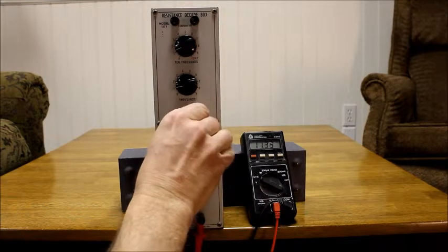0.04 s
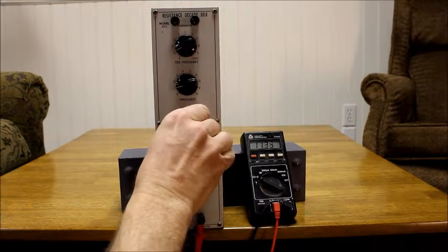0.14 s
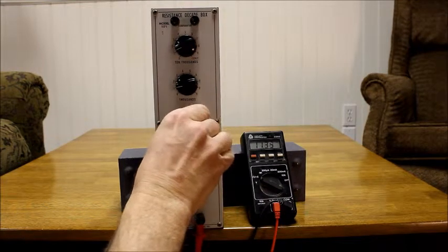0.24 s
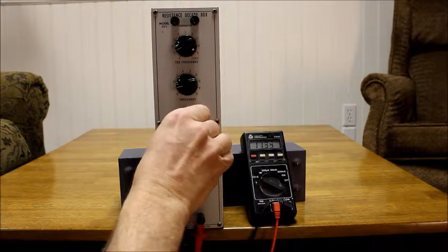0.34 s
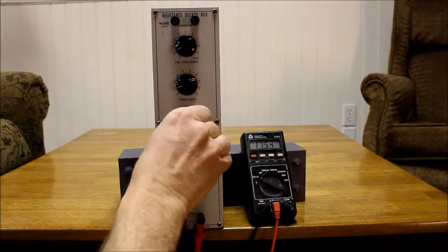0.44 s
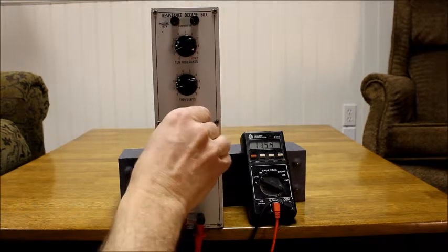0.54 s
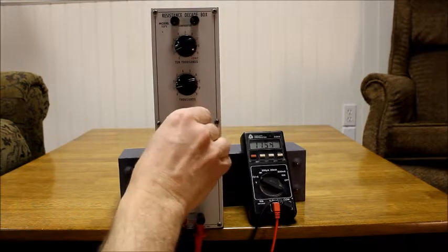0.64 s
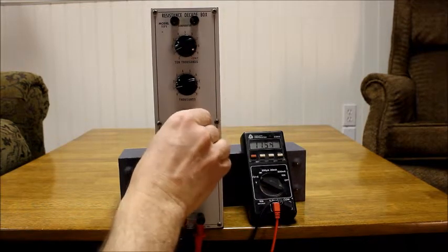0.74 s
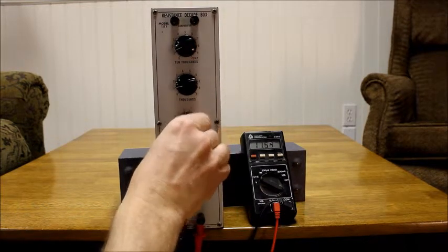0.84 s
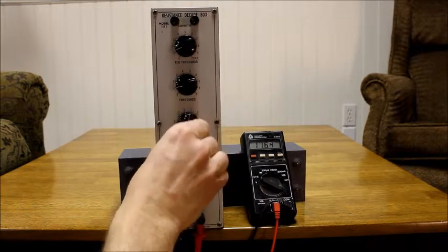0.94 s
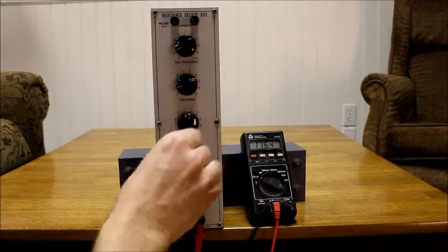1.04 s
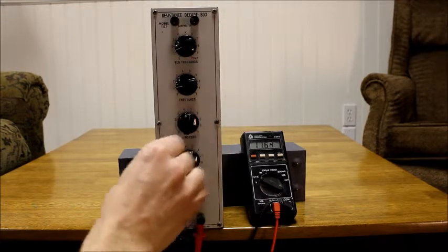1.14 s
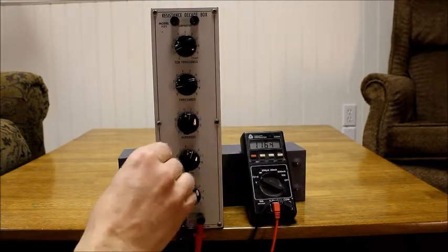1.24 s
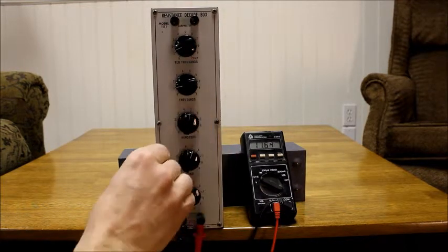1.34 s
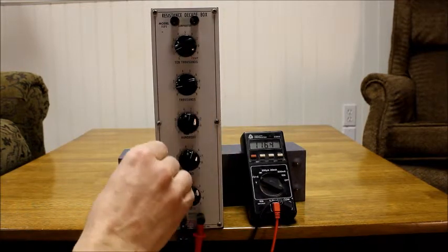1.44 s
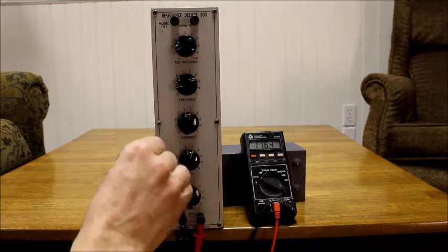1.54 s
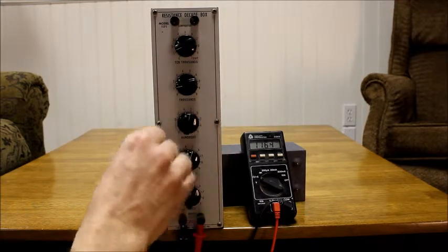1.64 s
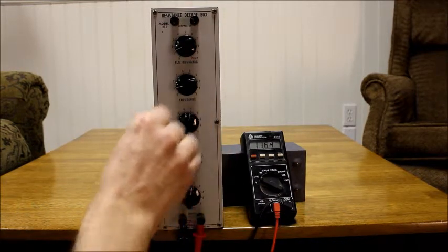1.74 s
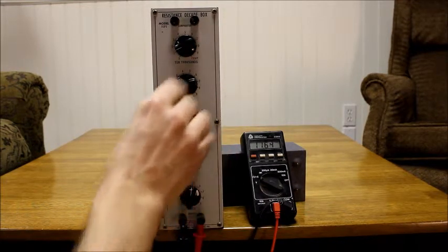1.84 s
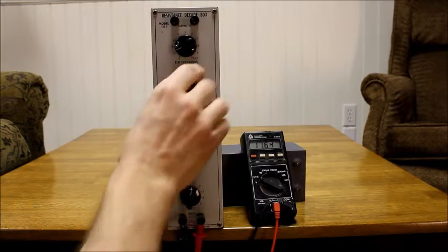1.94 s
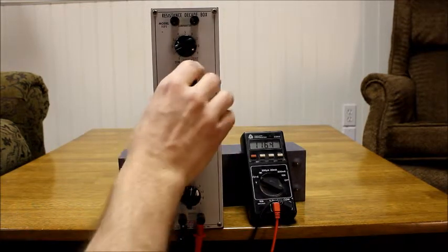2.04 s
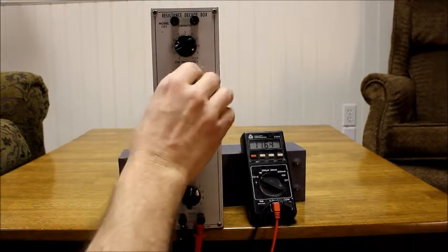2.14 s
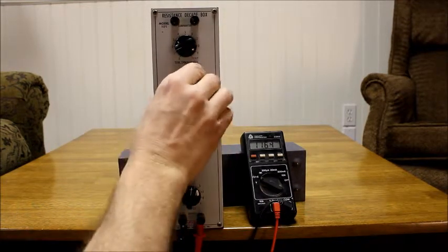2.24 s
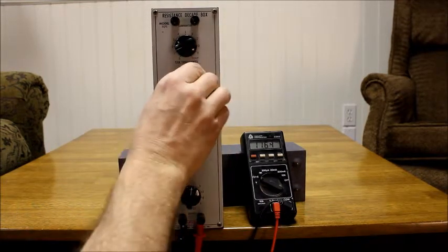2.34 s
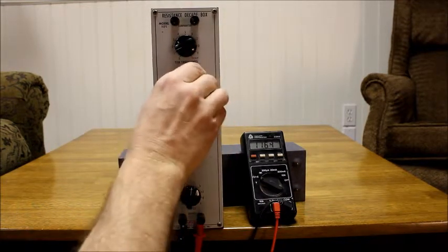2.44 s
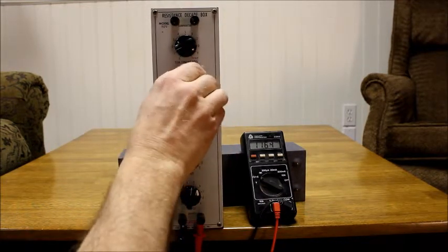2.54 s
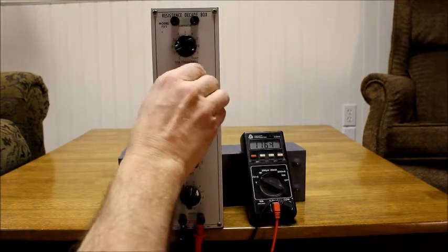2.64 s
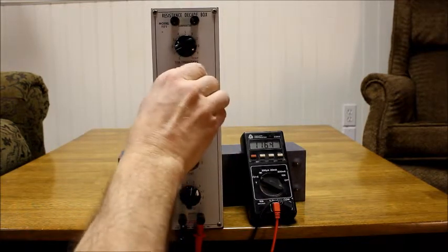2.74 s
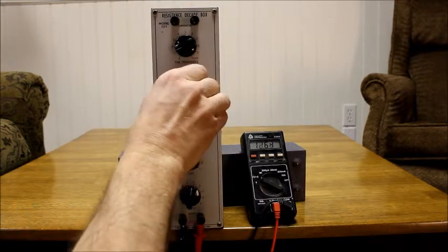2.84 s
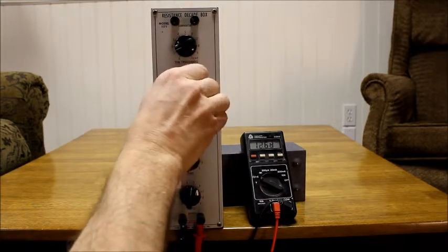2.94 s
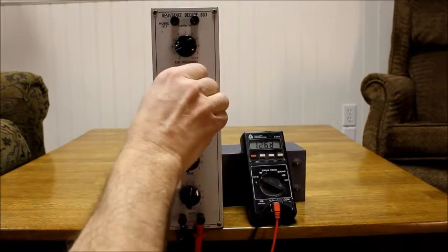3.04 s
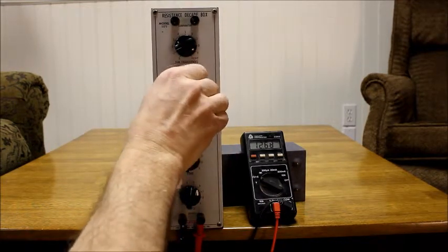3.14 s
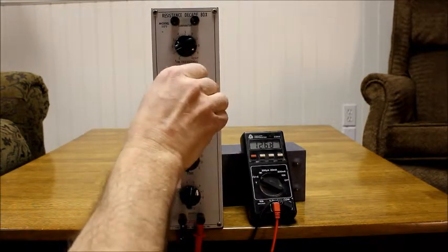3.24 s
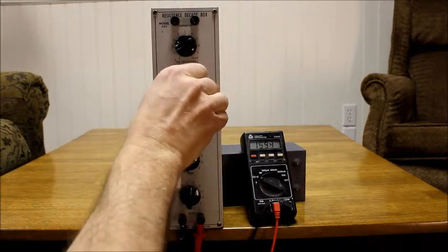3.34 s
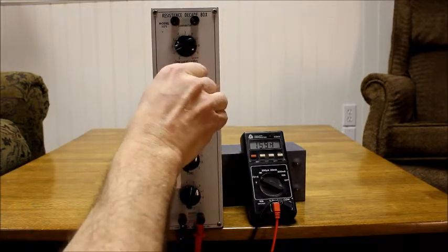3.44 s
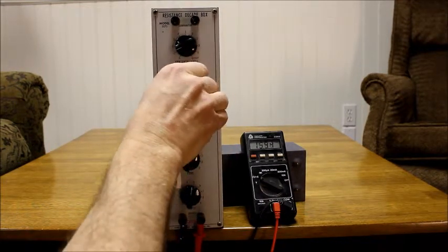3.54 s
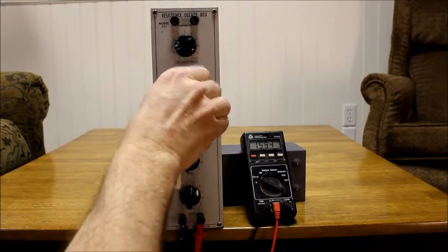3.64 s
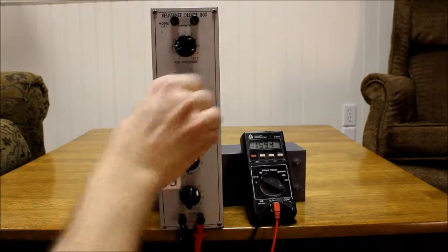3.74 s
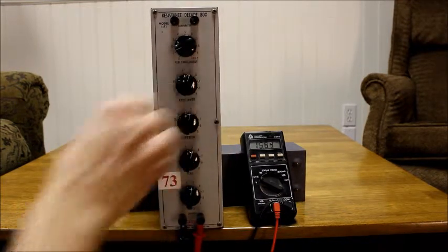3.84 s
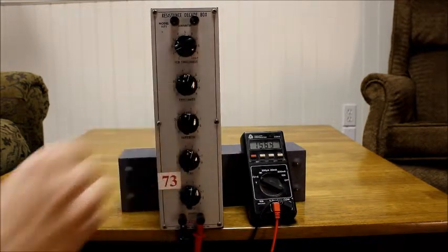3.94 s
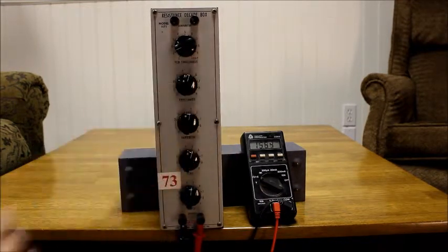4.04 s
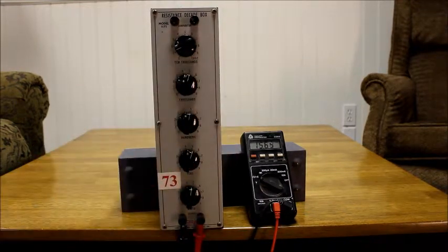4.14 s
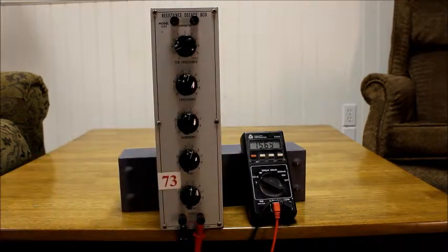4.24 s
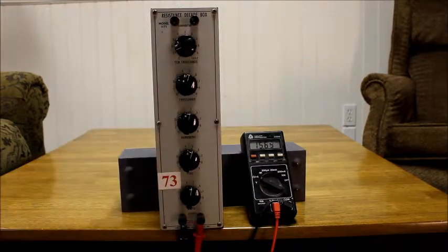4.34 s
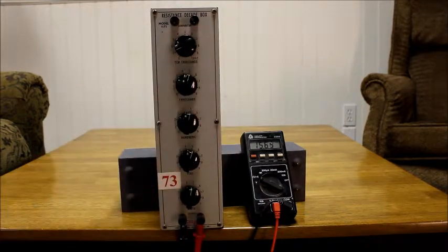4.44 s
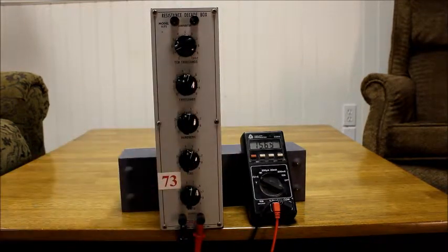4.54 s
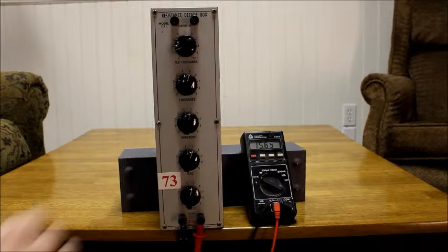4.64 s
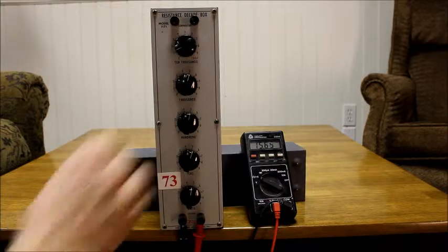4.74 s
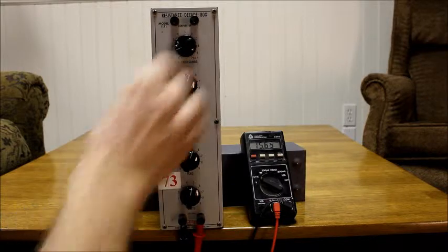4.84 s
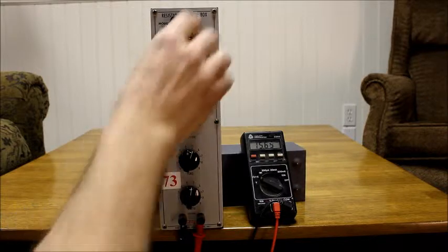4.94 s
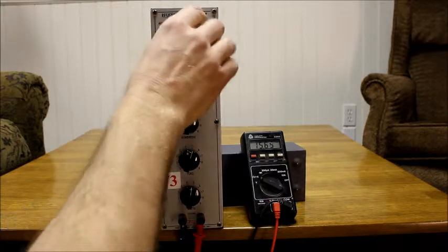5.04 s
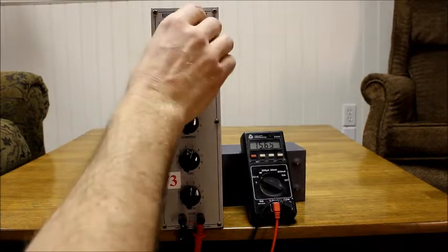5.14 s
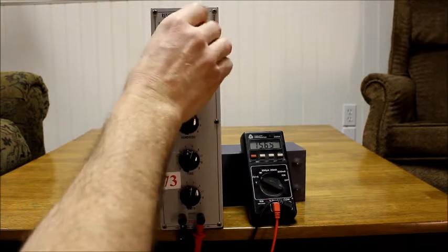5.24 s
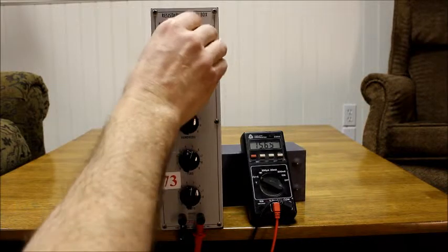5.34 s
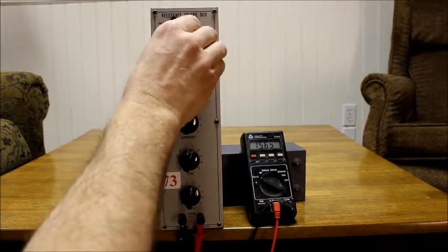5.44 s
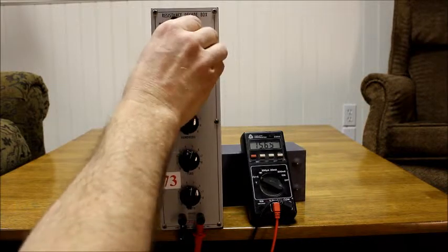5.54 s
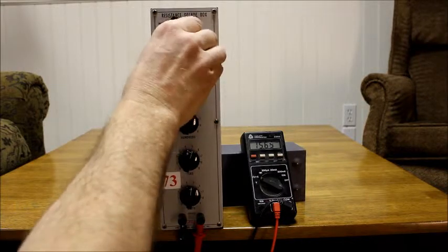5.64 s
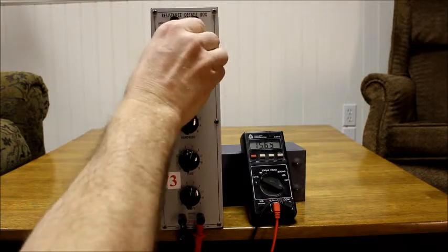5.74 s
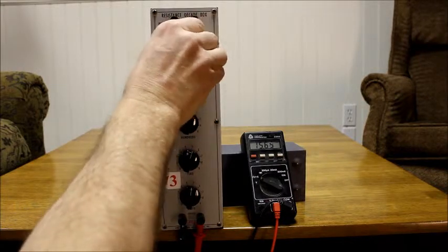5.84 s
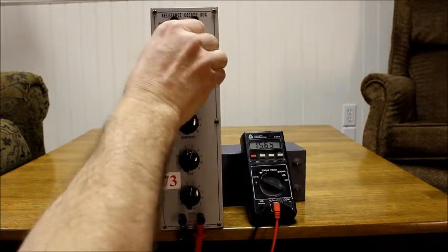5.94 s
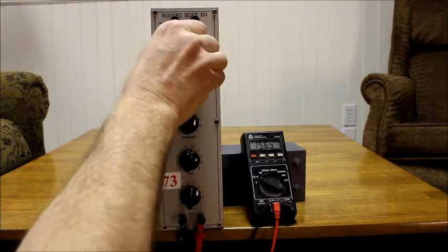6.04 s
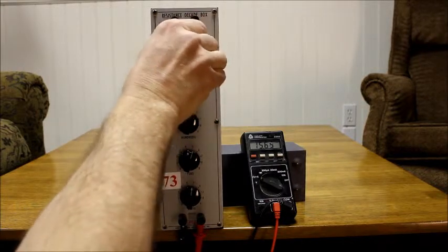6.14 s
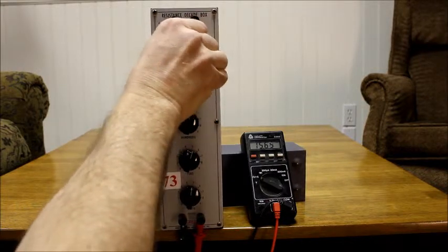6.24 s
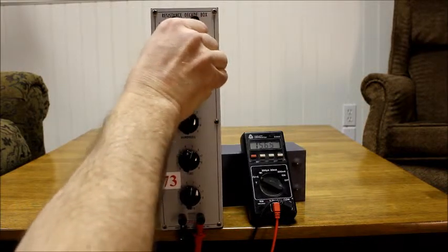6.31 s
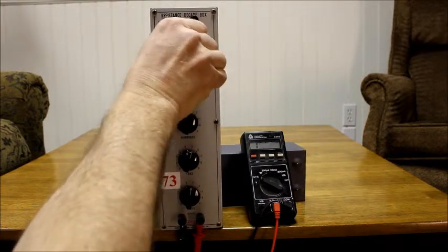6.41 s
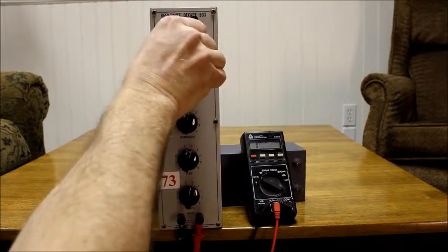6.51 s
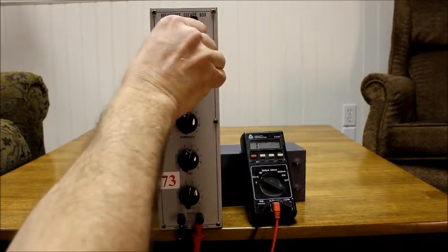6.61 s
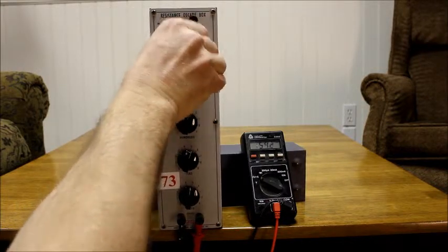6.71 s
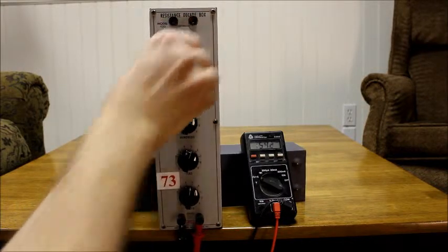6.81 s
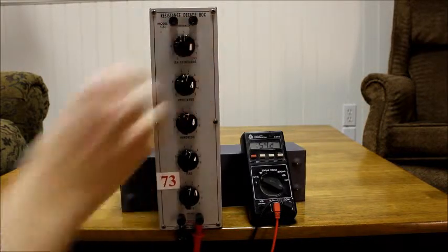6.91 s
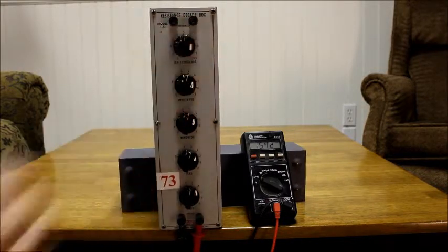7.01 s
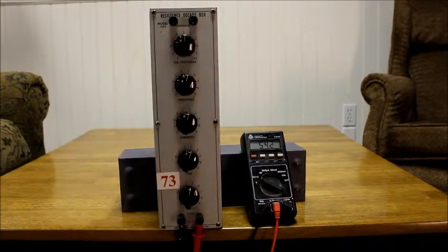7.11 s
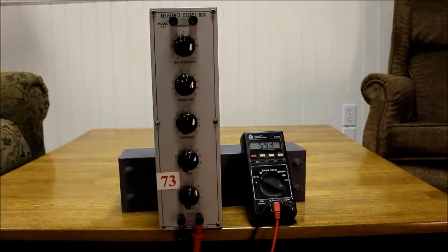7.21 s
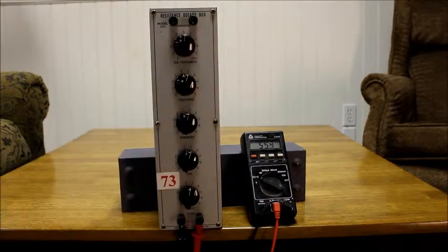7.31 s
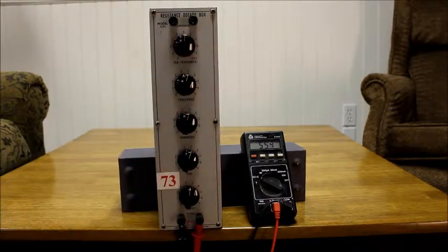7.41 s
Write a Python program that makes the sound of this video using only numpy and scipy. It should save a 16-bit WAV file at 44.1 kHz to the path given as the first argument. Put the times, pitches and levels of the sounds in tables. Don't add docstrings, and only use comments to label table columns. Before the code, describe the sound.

Close by, a hand steps rotary switches on a sheet-metal box. Two bright, loud clicks come at once, then a pause; four evenly spaced clacks follow with woody thumps, then faint handling, then four more, softer and more hollow. Tiny loose contacts jangle after each snap. A small furnished room answers briefly over low ventilation rumble and faint hiss.

```python
import sys
import numpy as np
from scipy import signal
from scipy.fft import rfft, irfft, next_fast_len
from scipy.io import wavfile
from scipy.ndimage import uniform_filter1d

SR = 44100
rng = np.random.default_rng(int(sys.argv[2]) if len(sys.argv) > 2 else 0)


def gain_from_db(level_db):
    decades = np.asarray(level_db, float) / 20
    return 10 ** decades


def persist_wave(psi):
    counts = np.round(np.clip(psi, -1, 1) * 32767).astype(np.int16)
    wavfile.write(sys.argv[1], SR, np.atleast_2d(counts).T)


N = 329427
LEAD = 4410
SPAN = 8192
T = np.arange(SPAN) / SR

# [t/s, snap level/dB,
# strongest ring f/Hz, knock into knob and case level/dB]
MIDDLE_SWITCH_DETENTS = [
    (-0.063, -8, 8700, -23),
                         (0.165, -15.5, 2880, -23),
    (0.4767, -15, 3470, -21),
]
UPPER_DETENTS = [
    (2.6338, -18.5, 7000, -12.5),
    (2.8908, -20.5, 6850, -9),
    (3.1802, -18, 3480, -12),
    (3.4765, -20, 7650, -10),
]
TOP_DETENTS = [
    (5.7542, -22.5, 6800, -7),
    (6.0325, -23, 7430, -7.5),
    (6.3205, -19, 6480, -10.5),
    (6.6253, -21.5, 7180, -7.5),
]
# [t/s, snap level/dB, ring f/Hz, knock level/dB]
TOUCHES = [(0.4492, -50, 3680, -21), (2.3888, -36, 6100, -13), (2.5194, -68, 3690, -7),
           (3.692, -51.5, 2680, -5), (5.2325, -50, 2740, -6), (5.3991, -48.5, 2850, -6.5),
           (5.417, -50.5, 2890, -6), (6.8214, -38, 2970, -12), (7.1023, -52.5, 4360, -5),
           (7.2418, -47, 2000, -6.5)]
# [t/s, snap level/dB, ring f/Hz]
BOUNCES = [
    (0.1764, -30, 2700),
    (2.6685, -35.5, 2900),
    (5.7567, -26, 4300),
    (6.0398, -33.5, 3540),
    (6.0482, -39, 4000),
    (6.342, -45, 4350),
]
# [f/Hz, width/Hz, level/dB]
MIDDLE_RINGS = [(2700, 350, 12), (5320, 64, 2), (6830, 390, 12), (7400, 120, -1), (8440, 140, -22),
                (12000, 81, -8), (12700, 130, -14), (13700, 440, -8), (14700, 130, -23)]
UPPER_RINGS = [(2670, 130, -1), (4860, 130, -18), (6560, 180, 7.5), (3860, 480, 12), (7300, 200, 5),
               (9300, 110, 3), (10000, 160, 7), (10800, 170, -4), (12800, 400, -15.5)]
TOP_RINGS = [(2850, 550, 11.5), (4300, 240, 3), (5840, 830, 5), (9450, 120, 9), (10800, 180, 2),
             (13400, 160, 15), (12800, 190, 11), (13800, 210, -8.5), (14700, 130, -20.5)]
# [f/Hz, level/dB, t60/s]
MIDDLE_KNOB = [(1406, -0.58, 0.011), (1797, -1.4, 0.075)]
MIDDLE_CASE = [(428, 26, 0.058), (610, 9, 0.14), (720, -23, 0.062)]
UPPER_KNOB = [(1270, -1, 0.016), (1430, -2, 0.0061), (1700, -10.5, 0.072), (1094, -25, 0.0076)]
UPPER_CASE = [(414, -7.5, 0.07), (618, -15, 0.31), (690, 4, 0.027)]
TOP_KNOB = [(1316, -3.5, 0.023), (1561, -14.5, 0.073), (1130, -48, 0.004)]
TOP_CASE = [(280, 16, 0.044), (408, 23.5, 0.038), (527, -3, 0.12), (600, -19, 0.046), (734, -1, 0.11)]
# [f/Hz, level/dB]
SNAP_COLOUR = [(900, -21.5), (1600, -8.5), (2200, -7.5), (3100, -3.5), (4300, -4.5), (5500, 0.5),
               (7200, -6), (8800, -9.5), (10000, -40.5)]
SPARKLE_COLOUR = [(7800, -8), (9000, 5.5), (10500, 11), (12000, 6), (13500, 9.5), (15000, 6.5),
                  (16000, -14), (17000, -22)]
MIDDLE_PARTS = (MIDDLE_RINGS, MIDDLE_KNOB, MIDDLE_CASE)
UPPER_PARTS = (UPPER_RINGS, UPPER_KNOB, UPPER_CASE)
TOP_PARTS = (TOP_RINGS, TOP_KNOB, TOP_CASE)
# [events, parts, light blow?, sparkle level/dB, case over knob level/dB, rattle t60/s,
# jangle level/dB, snap level/dB, lift of the sparkle above 11 kHz/dB, panel level/dB]
BLOWS = (
    (MIDDLE_SWITCH_DETENTS, MIDDLE_PARTS, False, .6, 5.5, .014, -15, -6, 5, -10),
    (UPPER_DETENTS, UPPER_PARTS, False, -4, -.3, .018, -13, -5, -4, -7),
    (TOP_DETENTS, TOP_PARTS, False, -7.5, -.4, .009, -8, -5, .6, -11),
    (TOUCHES, UPPER_PARTS, True, -16, 4, .02, -9, -10, -1.5, -20),
    ([(*row, -30) for row in BOUNCES], UPPER_PARTS, True, -12, .1, .014, -16, -6, 1.5, -14),
)
LIGHT_SPARKLE_DB_PER_OCTAVE = 11.5

# [f/Hz, t60/s]
ROOM_T60 = [(150, 1), (400, 0.79), (1000, 0.27), (2800, 0.16), (7000, 0.17), (14000, 0.064)]
ROOM_DB, EARLY_DB, EARLY_T60_S = -14.5, -15, 0.045
# [f/Hz, level per Hz/dB]
AIR_COLOUR = [(15, -68), (25, -16), (43, -23.5), (59, -6), (109, -0.5), (231, -11), (318, -10),
              (383, -15.5), (427, -11), (673, -21), (856, -19.5), (1060, -25.5), (4500, -32.5),
              (15000, -39)]
AIR_DB = -47.5
WHISTLE_HZ, WHISTLE_DB, WHISTLE_THROB_HZ = 15735, -74, 13.5

# [t/s, thump level/dB, hardness level/dB]
ROCKS = [(0.009, -39, -12), (2.64, -25.5, -7.5), (2.674, -24, -1.5), (2.896, -31.5, -3),
         (3.185, -31, -14.5), (3.479, -36, -3), (5.262, -38, -8), (5.317, -38, -7), (5.409, -36.5, -16),
         (5.488, -42, -14), (5.573, -43, -2), (5.768, -24, -11.5), (5.784, -23.5, -8), (6.03, -31.5, -1.5),
         (6.321, -27, -3), (6.622, -39.5, -19), (6.779, -39.5, -7), (6.83, -38.5, -16), (6.901, -45, -7)]
LANDINGS = [
    (2.668, -24, 5),
    (5.757, -24, -8),
]
ROCK_PUSH_S, LANDING_PUSH_S = 0.0358, 0.0061
# [f/Hz, level/dB, t60/s]
TABLE_MODES = [(151, -25, 0.024), (170, 0.8, 0.14), (196, -4.5, 0.17), (290, -2.5, 0.031),
               (447, 1.5, 0.056), (508, -5.5, 0.042), (650, -9.5, 0.055), (872, -30, 0.015)]
TOP_HZ = 15830


def along(table, hz):
    return np.interp(np.log(hz + 1), np.log(np.array(table)[:, 0]), np.array(table)[:, 1])


def decay(t60, t=T):
    return np.exp(-np.log(1000) * t / t60)


def conv(blow, response):
    return signal.fftconvolve(blow, response)[:len(blow)]


def peak(x, db):
    return x * gain_from_db(db) / np.sqrt(uniform_filter1d(x ** 2, size=176).max())


def band_pass(x, lo_hz, hi_hz):
    return signal.sosfilt(signal.butter(2, [lo_hz, hi_hz], "band", fs=SR, output="sos"), x)


def colour(db):
    cepstrum = irfft(db * np.log(10) / 20)
    cepstrum[1:512] *= 2
    cepstrum[513:] = 0
    return irfft(np.exp(rfft(cepstrum)))


def modes(table, scatter_db=1.8, detune=.012):
    hz, db, t60 = np.transpose(table)[:, :, None]
    level_luck, pitch_luck = rng.standard_normal((2, len(table), 1))
    sines = np.sin(2 * np.pi * hz * (1 + detune * pitch_luck) * T)
    return np.sum(gain_from_db(db + scatter_db * level_luck) * sines * decay(t60), axis=0)


def rattle(t60, rate, rise_s):
    chance = rng.random((2, SPAN))
    hits = (chance[0] < rate / SR) * (2 * chance[1] - 1)
    return hits * (1 - np.exp(-T / rise_s)) * decay(t60)


def add(out, s, x):
    i = int(s * SR) + LEAD
    out[..., i:i + SPAN] += x[..., :N + LEAD - i]


def detent(row, rings, knob, case, rattle_t60, jangle_db, snap_db, edge_db, panel_db):
    _, db, ring_hz, sparkle_db, knob_db, case_db = row
    blow = peak(rattle(rattle_t60, rate=16000, rise_s=.0004), 0)
    strike = peak(rattle(.003, rate=16000, rise_s=.0003), 0)
    blow = blow + gain_from_db(-8) * strike
    jangle = peak(rattle(.1, rate=15000, rise_s=.004), jangle_db)

    hz = np.arange(513) * SR / 1024
    snap = conv(blow + jangle, colour(along(SNAP_COLOUR, hz)))
    edge = edge_db * np.clip((hz - 11000) / 2000, 0, 1)
    sparkle = conv(blow + gain_from_db(-3) * jangle, colour(along(SPARKLE_COLOUR, hz) + edge))

    ring = conv(strike, np.sin(2 * np.pi * ring_hz * T) * decay(.006))
    for _ in range(2):
        ring = band_pass(ring, .6 * ring_hz, 1.6 * ring_hz)

    damped = [(f, g + sparkle_db * (f > 9000), 2.2 / max(width, 70 + f / 100)) for f, width, g in rings]
    panel = conv(blow + gain_from_db(1.5) * jangle, modes(damped))
    metal = peak(snap, snap_db) + peak(band_pass(panel, 1600, 17200), panel_db)

    knock = band_pass(conv(rattle(.04, rate=4400, rise_s=.0009), modes(knob)), 980, 1470)
    boom = band_pass(conv(rattle(.18, rate=3000, rise_s=.0015), modes(case)), 337, 1270)
    body = peak(sparkle, sparkle_db - .5) + peak(knock, knob_db - .5) + peak(boom, case_db - .5)
    return gain_from_db(db) * np.array([metal + body, peak(ring, -0.58)])


def cam_scrape(db):
    noise = band_pass(rng.standard_normal(SPAN), 1500, 4000)
    return peak(noise * (T < .008) * decay(.03, np.abs(.008 - T)), db)


def switches():
    out = np.zeros((2, N + LEAD))
    for events, parts, light, sparkle_db, case_db, *character in BLOWS:
        for s, db, ring_hz, knock_db in events:
            crisp_db = sparkle_db + light * LIGHT_SPARKLE_DB_PER_OCTAVE * np.log2(ring_hz / 3000)
            row = (s, db, ring_hz, crisp_db, knock_db, knock_db + case_db)
            add(out, s, detent(row, *parts, *character))
            add(out[0], s - .008, cam_scrape(db - 31))
    return out


def room():
    t, tail = np.arange(2 * SPAN) / SR, 0
    for hz in 125 * 2 ** np.arange(8):
        octave = band_pass(rng.standard_normal(len(t)), hz / np.sqrt(2), min(hz * np.sqrt(2), .49 * SR))
        tail = tail + octave * decay(along(ROOM_T60, hz), t) * min(hz / 1400, 1)
    tail = tail * np.clip((t - .004) / .0019, 0, 1)
    early = rng.standard_normal(len(t)) * decay(EARLY_T60_S, t) * np.clip((t - .0015) / .0023, 0, 1)
    tail = tail / np.sqrt(np.sum(tail ** 2))
    early = early / np.sqrt(np.sum(early ** 2))
    return gain_from_db(ROOM_DB) * tail + gain_from_db(EARLY_DB) * early


def air():
    gain = gain_from_db(along(AIR_COLOUR, np.arange(N // 2 + 1) * SR / N))
    noise = irfft(rfft(rng.standard_normal(N)) * gain, N)
    low = signal.sosfilt(signal.butter(2, 500, fs=SR, output="sos"), noise)
    walk = np.interp(np.arange(N), np.linspace(0, N, num=24), rng.standard_normal(24))
    noise = noise + low * (gain_from_db(1.6 * walk) - 1)
    t = np.arange(N) / SR
    throb = 1 + .9 * np.sin(2 * np.pi * WHISTLE_THROB_HZ * t)
    whistle = np.sin(2 * np.pi * WHISTLE_HZ * t) * throb
    return noise / noise.std() * gain_from_db(AIR_DB) + np.sqrt(2) * gain_from_db(WHISTLE_DB) * whistle


def table_thumps():
    out = np.zeros(N + LEAD)
    for events, push_s in ((ROCKS, ROCK_PUSH_S), (LANDINGS, LANDING_PUSH_S)):
        for s, db, hard_db in events:
            push = rng.standard_normal(SPAN) * (T / push_s) * np.exp(-T / push_s * 3)
            wood = modes([(f, g + hard_db * (f > 250), t60) for f, g, t60 in TABLE_MODES])
            thump = band_pass(conv(push, wood), 177, 1650)
            add(out, s - push_s / 10, peak(thump, db - .5))
    return out


def scene():
    box, beam = switches()
    wood = table_thumps()
    echoes = conv(box + gain_from_db(-6) * beam + gain_from_db(-5) * wood, room())
    heard = box + beam + wood + echoes
    return (heard[LEAD:] + air())[None]


def low_pass(x):
    return signal.sosfilt(signal.butter(12, 17010, fs=SR, output="sos"), x)


def record(dry):
    size = next_fast_len(N)
    hz = np.arange(size // 2 + 1) * SR / size
    below = np.clip((TOP_HZ - hz) / 30, 0, 1)
    above = (1 - below) * gain_from_db(-30 * ((hz - TOP_HZ) / 1000).clip(0) ** 2)
    kept, over = (irfft(rfft(dry, size) * gain, size)[:, :N] for gain in (below, above))
    jump = np.abs(dry - uniform_filter1d(dry, size=5))
    sharp = uniform_filter1d(jump, size=200) > gain_from_db(-33)
    spill = gain_from_db(3) * over * uniform_filter1d(1. * sharp, size=100)
    return low_pass(kept + spill)


dry = scene()
out = record(dry)
persist_wave(out)
```